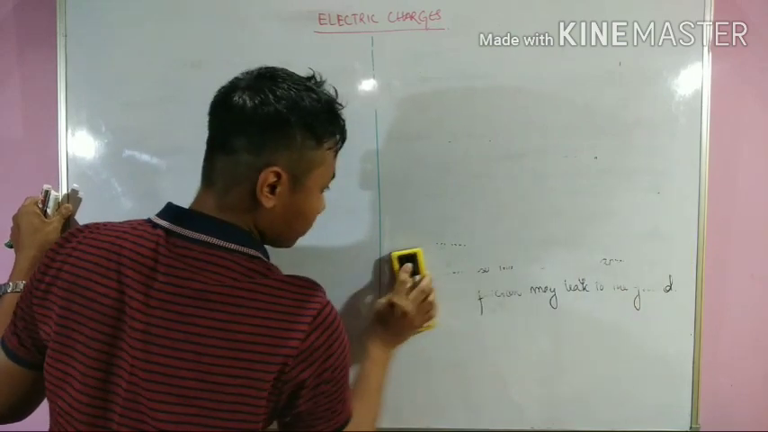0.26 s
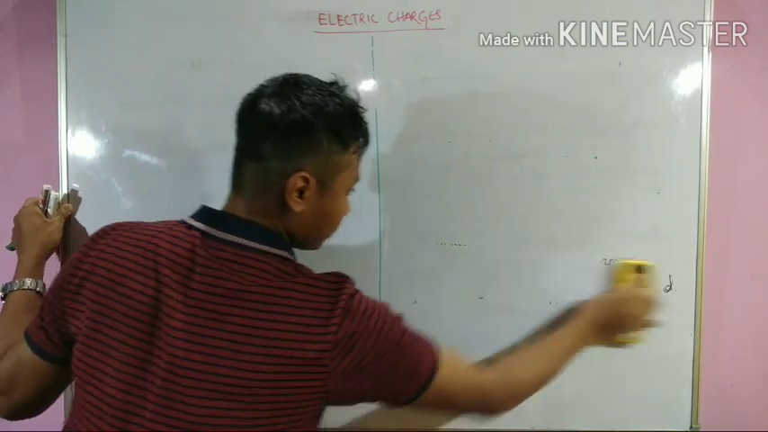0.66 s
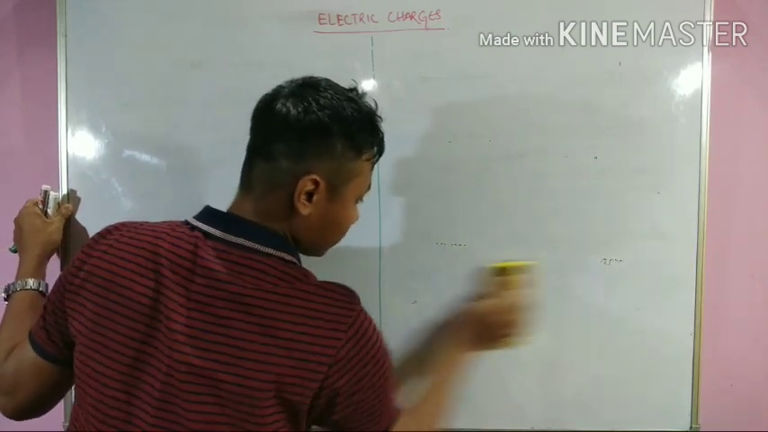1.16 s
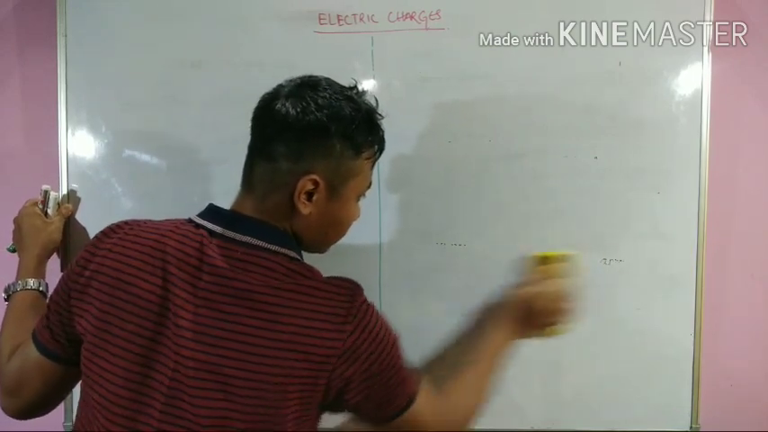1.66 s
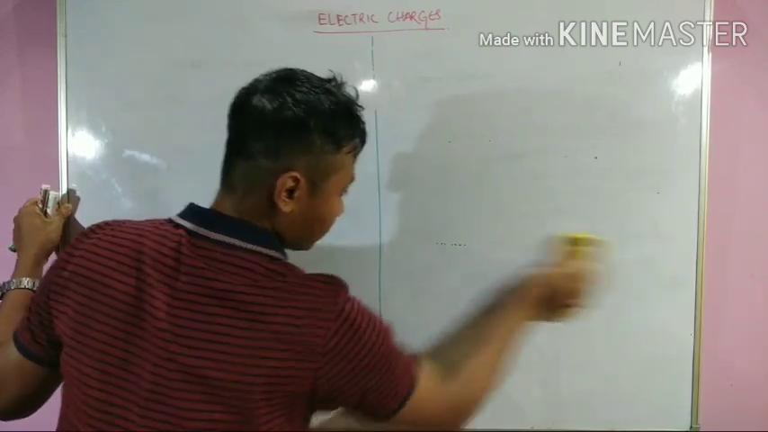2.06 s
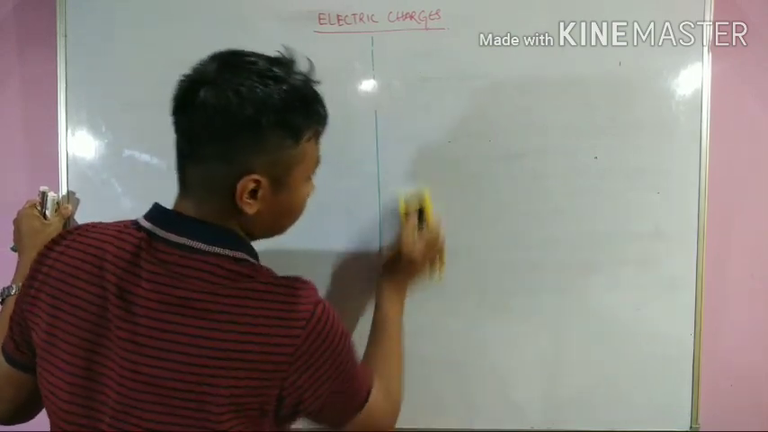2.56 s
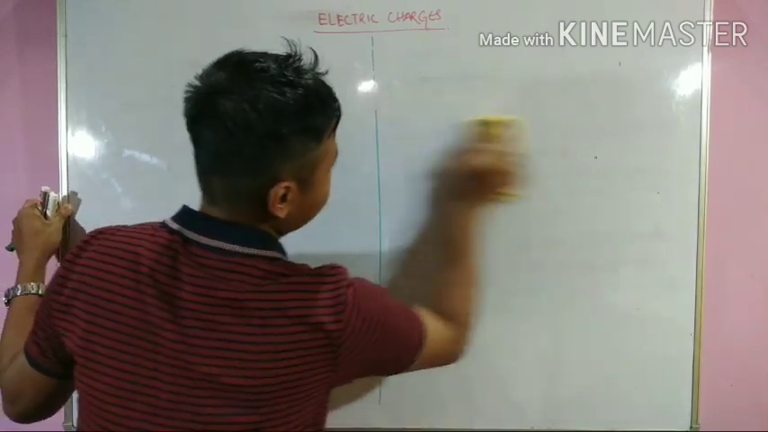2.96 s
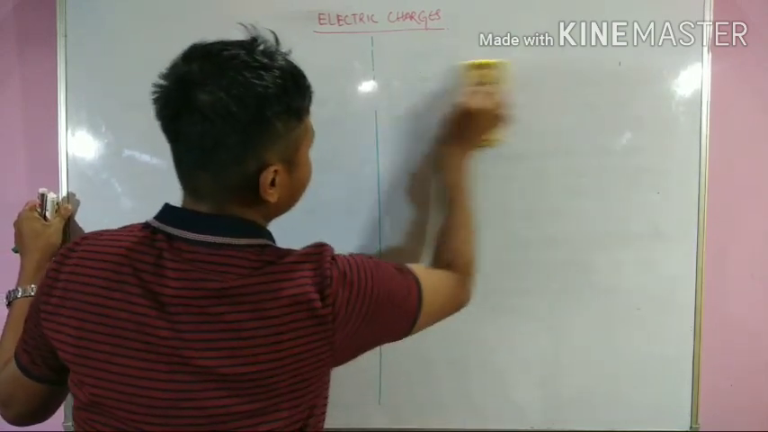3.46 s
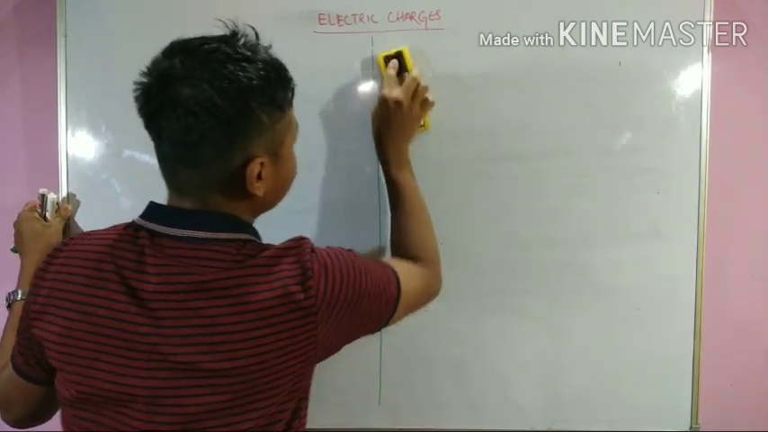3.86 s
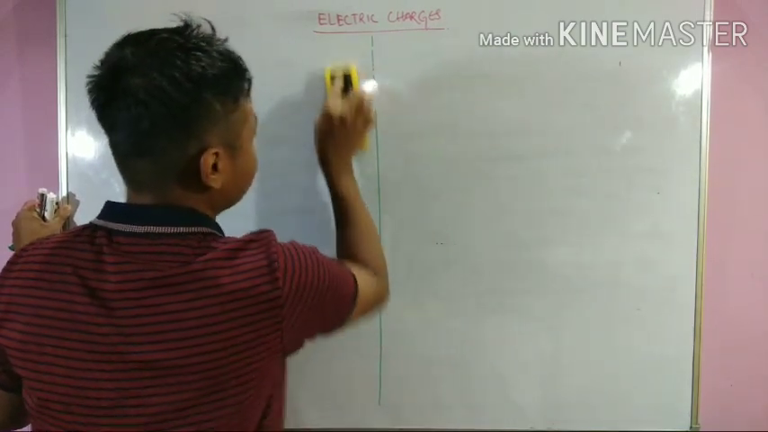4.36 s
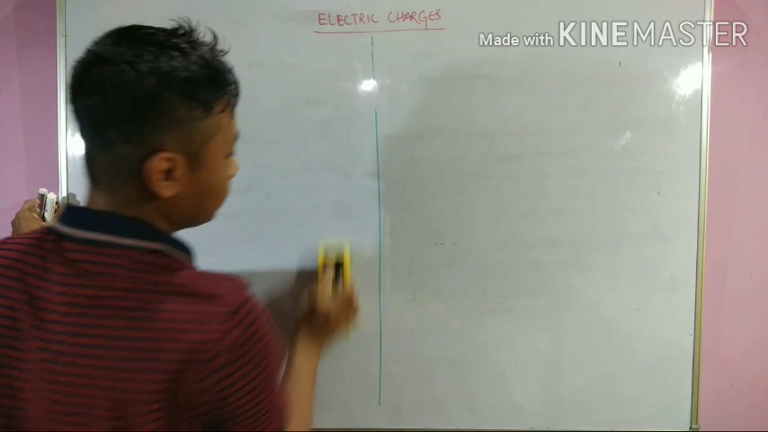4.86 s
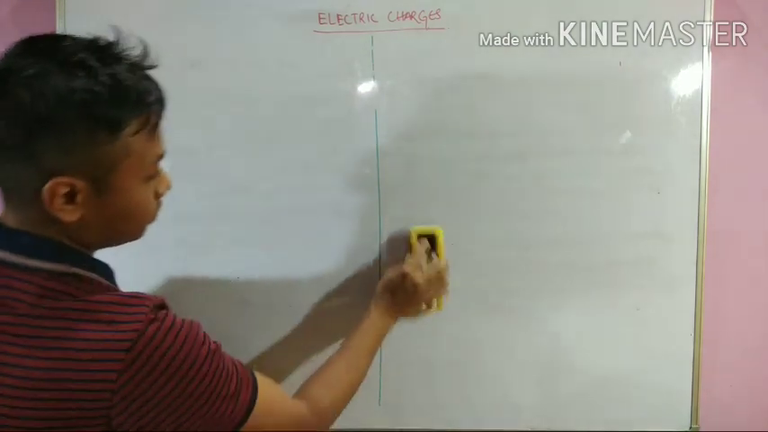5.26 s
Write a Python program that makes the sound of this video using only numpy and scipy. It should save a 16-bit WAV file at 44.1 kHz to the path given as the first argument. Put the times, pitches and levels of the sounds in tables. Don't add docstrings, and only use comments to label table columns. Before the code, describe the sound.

A felt eraser sweeps back and forth over a whiteboard with soft swishing hiss, then knocks sharply on the board near the end.

```python
import sys
import numpy as np
from scipy import signal
from scipy.fft import rfft, irfft
from scipy.io import wavfile
from scipy.ndimage import uniform_filter1d

SR = 44100
rng = np.random.default_rng(int(sys.argv[2]) if len(sys.argv) > 2 else 0)


def wrap_up_sound(samples):
    columns = np.atleast_2d(samples).T
    tamed = np.clip(columns, -1, 1)
    steps = np.round(tamed * 32767).astype(np.int16)
    wavfile.write(sys.argv[1], SR, steps)


def volts_from_decibels(level):
    exponent = np.asarray(level, float) / 20
    return 10 ** exponent


N = 243429

# fastest_s, at_speed_before_s, at_speed_after_s
SWEEPS = [(.03, .2, .215), (.63, .2, .29), (1.18, .11, .21), (1.72, .13, .205), (2.2, .09, .24),
          (2.73, .12, .075), (3.15, .17, .09), (3.53, .12, .19), (3.87, .03, .02), (4.06, .04, .09),
          (4.49, .05, .04), (4.8, .12, .215)]
# hiss_db, scuff_under_hiss_db
SWEEP_STRENGTH = [(-46, -7.5), (-50.5, -6), (-46.5, -8), (-46.5, -7.5), (-48, -8.5), (-51, -9.5),
                  (-47.5, -6), (-49.5, -9), (-58.5, -5.5), (-62.5, -5), (-61, -23), (-50.5, -6.5)]
# start_s, hiss_db, scuff_under_hiss_db, fade_db_per_s
SKIDS = [
    (4.302, -55.5, 1, 101),
    (5.136, -54, -14.5, 143),
    (5.403, -63.5, 4, 3),
    (5.473, -49, -5, 38),
]
SKID_RISE = [2500, 2500, 2440, 1490]
# start_s, drag_under_scuff_db, upper_over_middle_modes_db
GRIP = [(0, -8.5, 6.5), (.42, -13.5, 1), (.8, -12, 1.5), (1.3, -12, 2), (1.88, -17, 0), (2.04, -3, 12.5),
        (2.22, -16.5, 2.5), (2.6, -12, 0.5), (2.93, -24, -9), (3.22, -16, 19), (3.34, -8, 0.5),
        (3.8, -13, -1.5), (3.93, -16, -4), (4.27, -17, -2.5), (4.31, 2, 7), (4.62, -14, -19),
        (4.76, -14.5, 0), (5.2, -12, -2)]
# pitch_hz, level_db_per_hz
HISS_COLOUR = [(2060, -25.5), (3500, -5), (5500, -4), (8260, 2.5), (10700, 2.5), (14900, -2.5), (15700, 3),
               (16000, -50)]
# pitch_hz, level_db_per_hz
SCUFF_COLOUR = [(1200, -26), (1500, -2), (1930, -1), (2770, 1), (3860, -4.5), (5000, -4.5), (6500, -4.5),
                (11000, -67)]
# pitch_hz, level_db_per_hz
DRAG_COLOUR = [(800, -21.5), (1000, -5), (1250, -3.5), (1500, -2), (1900, -69), (3000, -71)]

# start_s, length_s, push_db, stiff_spot_lift_of_higher_modes_db, deepest_mode_weight_db
PUSHES = [(0, 0.15, -62.5, -16, -11), (0.138, 0.22, -65, -11, -8.5), (0.39, .22, -70, -7.5, -4.5),
          (0.623, .08, -73.5, 0.5, -18), (0.753, 0.28, -69, -5.5, -21), (1.073, 0.26, -67, -20, -19),
          (1.358, 0.31, -72.5, -8.5, -2.5), (1.632, 0.18, -56.5, -14.5, -23.5),
          (1.857, 0.094, -64.5, -13, -10), (1.985, 0.24, -76, -6, -17), (2.24, 0.2, -73.5, -1.5, 2),
          (2.486, 0.11, -69, -1, -10), (2.65, 0.036, -78.5, -10, -2), (2.884, 0.092, -84.5, -6, -20),
          (2.985, 0.15, -70.5, -6.5, -22), (3.328, 0.073, -94, 24.5, -27), (3.449, .12, -75.5, 6, -27),
          (3.68, 0.21, -91.5, 13.5, -3), (3.986, .07, -66.5, -5.5, -3), (4.11, 0.13, -84.5, 12, -1),
          (4.476, 0.16, -66, -5.5, -4.5), (4.746, 0.091, -72, 9, -0.5), (4.857, 0.31, -84, 11.5, -14),
          (5.165, 0.14, -90.5, 16, -25)]
# pitch_hz, width_hz, level_db
PANEL_MODES = [
    [(206, 82, -6.5), (271, 78, -0.5), (316.6, 81, -5.5)],
    [(127, 163, 0)],
    [(396.4, 130, 1.5), (518, 112, -0.5)],
    [(670.7, 144, -3), (829, 200, -7.5)],
]

# start_s, peak_db, pitch_hz, decay_cycles, room_share_db
TICKS = [
    (0.761, -47, 274.5, 4.5, 0),
    (.96, -51, 520, 7.1, -10),
    (0.962, -35, 1220, 0.88, -1),
    (2.528, -47, 280, 4.1, -21),
    (3.317, -43.5, 520, 3.5, -4),
    (3.966, -42, 243, 3.2, -17),
    (4.236, -60, 230, 4, 3),
    (5.044, -35.5, 1920, 2, -13),
    (5.075, -26, 1530, 0.71, -5),
]
# start_s, peak_db, pitch_hz, decay_cycles, room_share_db
CORNER_SNAP = (5.1321, -18, 10500, 1.0, -12)
# start_s, peak_db, hardness_db, room_share_db
KNOCKS = [
    (4.291, -20, 3.5, -10),
    (5.3988, -15, -2.5, -5.5),
    (5.4702, -22.5, -21, -20),
]
# pitch_hz, level_db, t60_s
STRUCK_MODES = [(157, -39, 0.9), (207, -27, 0.35), (266, 14, 0.088), (301, 4, 0.033), (390, -8, 0.079),
                (448, -8.5, 0.35), (520, -18.5, 0.4), (564, -15, 0.28), (706, -11.5, 0.03),
                (845, -13, 0.085), (922, -9, 0.082), (987, -9.5, 0.062)]
# pitch_hz, level_db_per_hz
CRACK_COLOUR = [(400, -34), (800, 8.5), (2200, 2), (3500, -4.5), (6000, -9), (12000, -33), (16000, -30)]
# pitch_hz, t60_s
ROOM_DECAY = [(120, 0.44), (250, 0.59), (500, 0.68), (1000, 0.81), (2000, 0.43), (5000, 0.13),
              (12000, 0.12)]

# pitch_hz, likeness_0_to_1
STEREO_LIKENESS = [(100, .98), (330, .97), (500, .45), (900, .22), (2000, .08), (4000, 0)]
# pitch_hz, left_minus_right_db
STEREO_TILT = [(300, 1), (600, -1), (2000, 0.5), (8000, -0.8), (13000, 0.9)]
# pitch_hz, level_db_per_band
EXPECTED_NOISE = [(80, -114.5), (200, -100), (500, -100), (1000, -92), (1500, -102), (4000, -108),
                  (12000, -108), (15500, -103)]
# pitch_hz, power_share
WEAK_SHARE = [(1200, .01), (2000, .3), (3000, .6), (4200, .74), (6000, .7), (8500, .52), (14000, .62)]
# pitch_hz, level_db_per_band
FAINT_LIMIT = [(6000, -125), (11500, -104), (13500, -93.5), (15000, -91.5), (15600, -74)]


def evened(x):
    return x / np.sqrt(np.mean(x ** 2) + 1e-20)


def read(points, hz):
    f, value = np.transpose(points)
    return np.interp(np.log(hz + 1), np.log(f + 1), value)


def ramp(start, end, rise_db, fall_db):
    t = np.arange(N) / SR
    rising = rise_db * (t - start)
    falling = fall_db * (end - t)
    return np.minimum(0, np.minimum(rising, falling))


def summed(levels_db):
    return 10 * np.log10(np.sum(volts_from_decibels(2 * np.maximum(levels_db, -150)), 0))


def lumps(seconds):
    size = int(seconds * SR)
    smooth = uniform_filter1d(rng.standard_normal(N), size)
    return evened(uniform_filter1d(smooth, size))


def paired(a, b):
    hz = np.fft.rfftfreq(len(a), 1 / SR)
    same = np.clip(read(STEREO_LIKENESS, hz), -1, 1)
    left = rfft(a)
    right = same * left + np.sqrt(1 - same ** 2) * rfft(b)
    lean = volts_from_decibels(read(STEREO_TILT, hz) / 2)
    return irfft(np.array([left * lean, right / lean]), len(a))


def speed():
    shoulder_db, speed_up_db_per_s, slow_db_per_s = 2.5, 153, 145
    scuff_follow = 0.63
    t = np.arange(N) / SR
    hiss, scuff = [], []
    for (s, lead, trail), (hiss_db, under_db) in zip(SWEEPS, SWEEP_STRENGTH):
        shape = ramp(s - lead, s + trail, speed_up_db_per_s, slow_db_per_s)
        shape = shape + np.interp(t, [s - lead, s, s + trail], [-shoulder_db, 0, -shoulder_db])
        hiss.append(hiss_db + shape)
        scuff.append(hiss_db + under_db + scuff_follow * shape)
    for (s, hiss_db, under_db, fade_db), rise_db in zip(SKIDS, SKID_RISE):
        shape = ramp(s, s, rise_db, fade_db)
        hiss.append(hiss_db + shape)
        scuff.append(hiss_db + under_db + scuff_follow * shape)
    return summed(hiss), summed(scuff)


def grip(column):
    table = np.array(GRIP)
    return np.interp(np.arange(N) / SR, table[:, 0], table[:, column])


def fibres(spectrum, grain_db, patchy_db):
    slips = rng.standard_normal((2, N)) * volts_from_decibels(grain_db * rng.exponential(1, (2, N)))
    hz, t, z = signal.stft(paired(*slips), SR, nperseg=512, noverlap=384)
    patches = uniform_filter1d(rng.standard_normal(z.shape[1:]), size=6, axis=0)
    patches = evened(uniform_filter1d(patches, size=16, axis=1))
    z = z * volts_from_decibels(read(spectrum, hz)[:, None] + patchy_db * patches)
    return evened(signal.istft(z, SR, nperseg=512, noverlap=384)[1][:, :N])


def felt():
    hiss_db, scuff_db = speed()
    flicker = volts_from_decibels(0.39 * lumps(0.013))
    hiss = fibres(HISS_COLOUR, grain_db=-0.1, patchy_db=-0.06)
    scuff = fibres(SCUFF_COLOUR, grain_db=1.0, patchy_db=1.66)
    drag = fibres(DRAG_COLOUR, grain_db=4.0, patchy_db=2.0)
    thin = signal.sosfiltfilt(signal.butter(4, 1950, "high", fs=SR, output="sos"), scuff)
    lightness = volts_from_decibels(ramp(3.96, 4.7, 86, 2000))
    scuff = scuff + lightness * (thin - scuff)
    drag_db = scuff_db + grip(column=1)
    return flicker * (volts_from_decibels(hiss_db + 2.9) * hiss + volts_from_decibels(scuff_db + 2.0) * scuff + volts_from_decibels(drag_db) * drag)


def pressure():
    press_db_per_s, ease_db_per_s = 460, 213
    spells = np.array([ramp(s, s + length, press_db_per_s, ease_db_per_s) + db
                       for s, length, db, _, _ in PUSHES])
    stiff_db, weight_db = np.array(PUSHES)[:, 3:].T[..., None]
    middle_db = summed(spells + stiff_db)
    return summed(spells), summed(spells + weight_db), middle_db, middle_db + grip(column=2)


def resonate(x, hz, width):
    turn = np.exp(2j * np.pi * np.cumsum(hz * np.ones(x.shape[-1])) / SR)
    r = np.exp(-np.pi * width / SR)
    smooth = signal.lfilter([(1 - r) ** 2], [1, -2 * r, r * r], x / turn)
    return 2 * (turn * smooth).real


def shaken_board():
    push = paired(*rng.standard_normal((2, N)))
    out = 0
    for level_db, modes in zip(pressure(), PANEL_MODES):
        ring = 0
        for hz, width, db in modes:
            ring = ring + volts_from_decibels(db) * evened(resonate(resonate(push, hz, width), hz, width))
        out = out + volts_from_decibels(level_db + 0.92 * lumps(0.0094)) * evened(ring)
    return out


def tick(hz, cycles):
    turns = np.arange(SR // 10) / SR * hz
    return np.sin(2 * np.pi * turns) * np.exp(-turns / cycles) * (1 - np.exp(-turns / 1.0))


def knock(hard_db):
    t = np.arange(SR // 2) / SR
    modes = 0
    for hz, db, t60 in STRUCK_MODES:
        level_db = db + hard_db * (hz > 700) - 60 * t / t60
        modes = modes + volts_from_decibels(level_db) * np.sin(2 * np.pi * hz * t)
    press = np.sin(np.pi * np.clip((t[:400] - .0012) / 0.00054, 0, 1))
    body = np.convolve(modes, press)[:len(t)]
    colour = volts_from_decibels(read(CRACK_COLOUR, np.fft.rfftfreq(len(t), 1 / SR)))
    grit = irfft(rfft(rng.standard_normal(len(t))) * colour, len(t))
    crack = evened(grit) * volts_from_decibels(-17 + hard_db - 60 * t / 0.04)
    needle = np.diff(rng.standard_normal(len(t) + 1)) * volts_from_decibels(-35 + 1.9 * hard_db - 60 * t / .022)
    return body / abs(body).max() + needle + crack


def room():
    taps = np.zeros((2, SR))
    at = np.arange(300, SR - 20, 20) + rng.integers(0, 20, (2, (SR - 301) // 20))
    np.put_along_axis(taps, at, rng.choice([-1., 1.], at.shape), 1)
    hz, t, z = signal.stft(paired(*taps), SR, nperseg=512)
    decay = volts_from_decibels(-60 * t / read(ROOM_DECAY, hz)[:, None])
    tail = signal.istft(z * decay, SR, nperseg=512)[1][:, :SR]
    tail = tail * np.clip((np.arange(SR) / SR - .006) / 0.0037, 0, 1)
    return tail / np.linalg.norm(tail[0])


def hits():
    sounds = [(s, db, wet_db, tick(hz, cycles)) for s, db, hz, cycles, wet_db in TICKS + [CORNER_SNAP]]
    sounds += [(s, db, wet_db, knock(hard_db)) for s, db, hard_db, wet_db in KNOCKS]
    near, far = np.zeros((2, N + SR))
    for s, db, wet_db, sound in sounds:
        start = round(s * SR)
        at = slice(start, start + len(sound))
        near[at] += volts_from_decibels(db - 4) * sound
        far[at] += volts_from_decibels(db - 2 + wet_db) * sound
    direct = np.array([np.roll(near, -4), near])
    echoes = signal.fftconvolve(far[None], room(), axes=1)[:, :N + SR]
    return (direct + echoes)[:, :N]


def scene():
    floor = volts_from_decibels(-100) * paired(*rng.standard_normal((2, N)))
    steady = felt() + shaken_board() + floor
    dulled = signal.sosfiltfilt(signal.butter(12, 15600, fs=SR, output="sos"), steady)
    return dulled + hits()


def suppressed(x):
    hz, t, z = signal.stft(x, SR, nperseg=1024, noverlap=768)
    power = uniform_filter1d((abs(z) ** 2).mean(0), size=5, axis=1)
    power = uniform_filter1d(power, size=3, axis=0) + 1e-20
    around = uniform_filter1d(power, size=21, axis=0)
    around = around * (uniform_filter1d(around, size=60, axis=1) / around) ** .1
    limit = read(WEAK_SHARE, hz)[:, None] * around + volts_from_decibels(2 * read(FAINT_LIMIT, hz)[:, None])
    total = power[20:].sum(0)
    calm = total < 30 * np.roll(total, 6)
    alive = 1 / (1 + calm * (limit / power) ** 12)
    noise = volts_from_decibels(2 * read(EXPECTED_NOISE, hz)[:, None])
    keep = np.maximum(1 - noise / power, volts_from_decibels(-10)) * alive
    return signal.istft(z * keep, SR, nperseg=1024, noverlap=768)[1][:, :N]


def band_limit(x):
    return signal.sosfilt(signal.butter(12, 16370, fs=SR, output="sos"), x)


def record(dry):
    cut = signal.sosfilt(signal.butter(4, 125, "high", fs=SR, output="sos"), dry)
    drift = signal.sosfilt(signal.butter(2, 45, fs=SR, output="sos"), rng.standard_normal(dry.shape))
    mix = suppressed(cut) + volts_from_decibels(-100) * evened(drift)
    return band_limit(mix)


dry = scene()
out = record(dry)
wrap_up_sound(out)
```